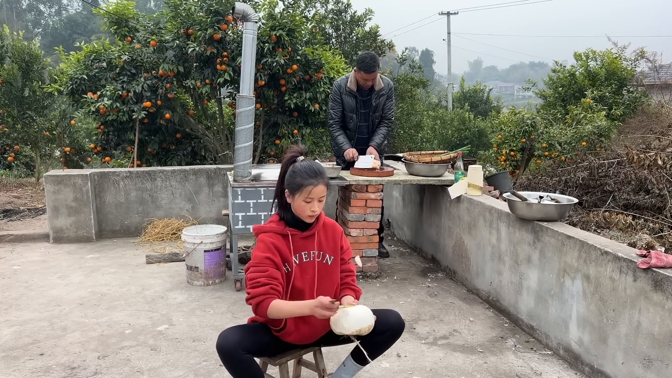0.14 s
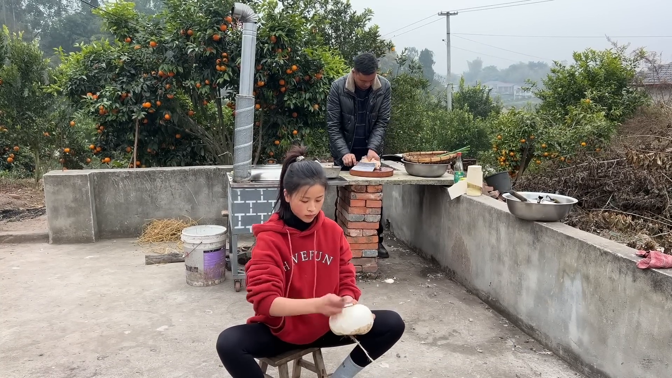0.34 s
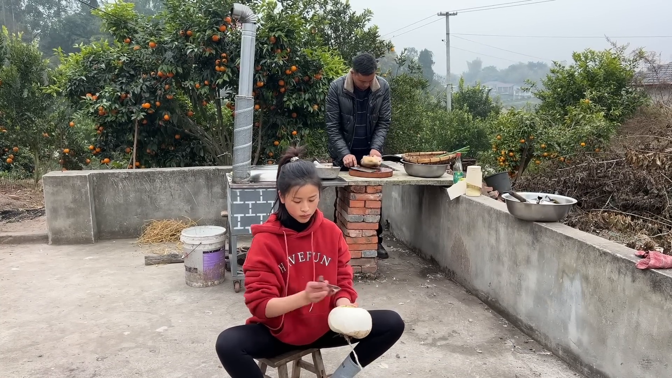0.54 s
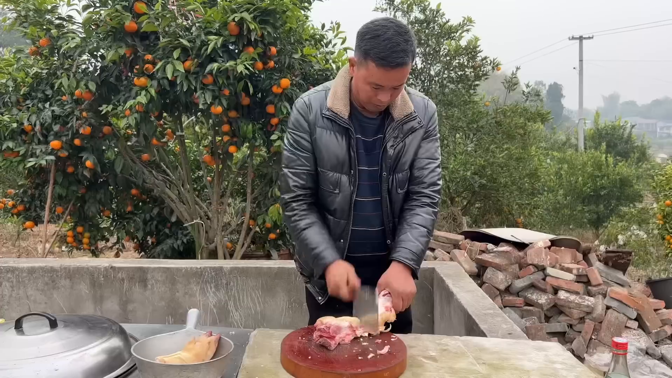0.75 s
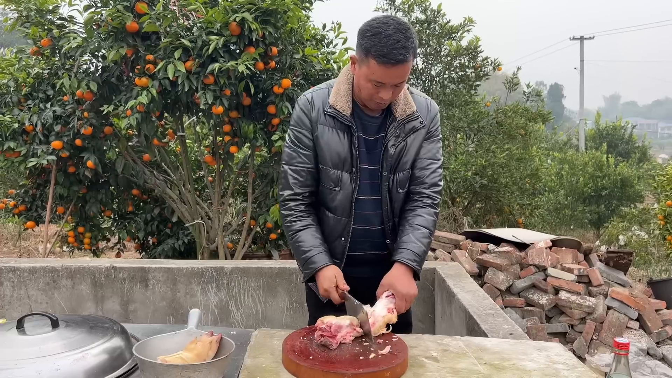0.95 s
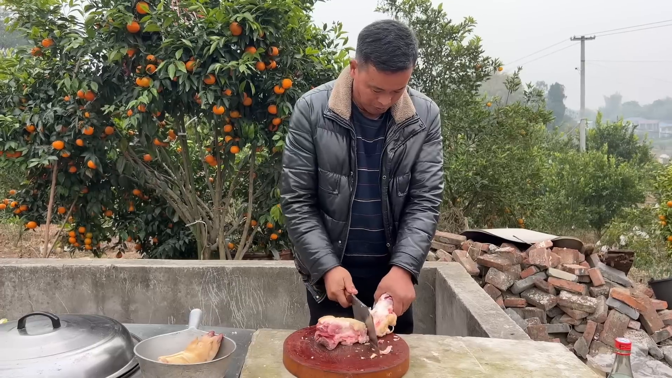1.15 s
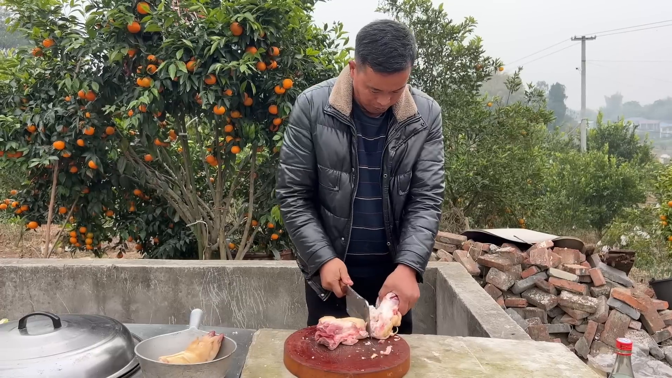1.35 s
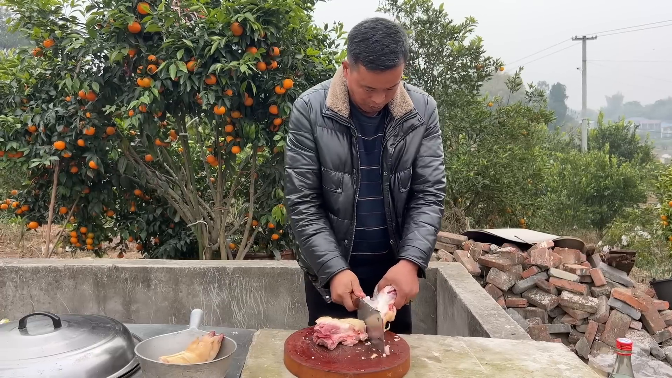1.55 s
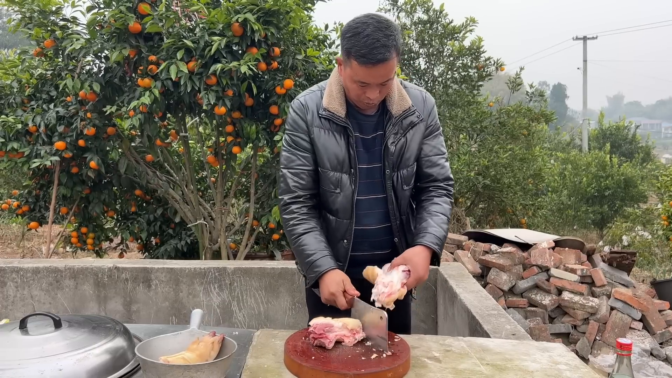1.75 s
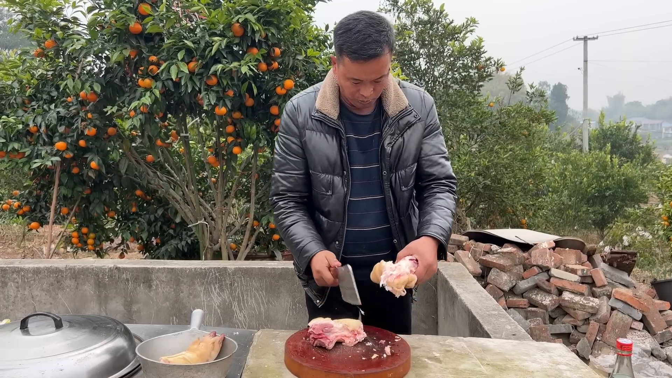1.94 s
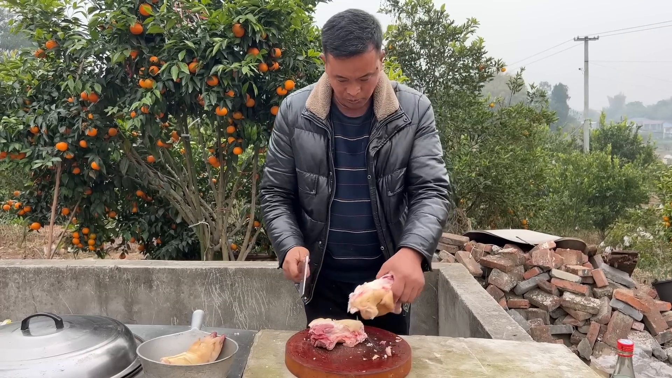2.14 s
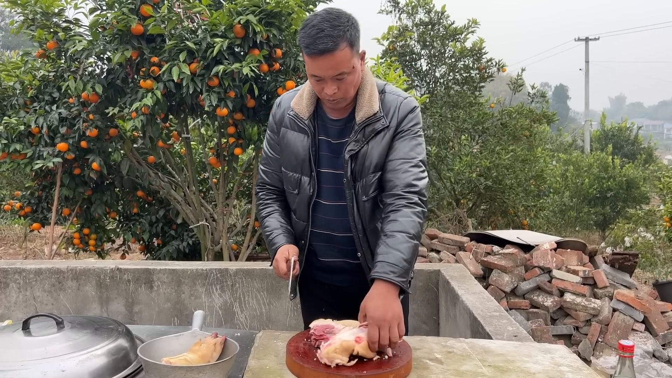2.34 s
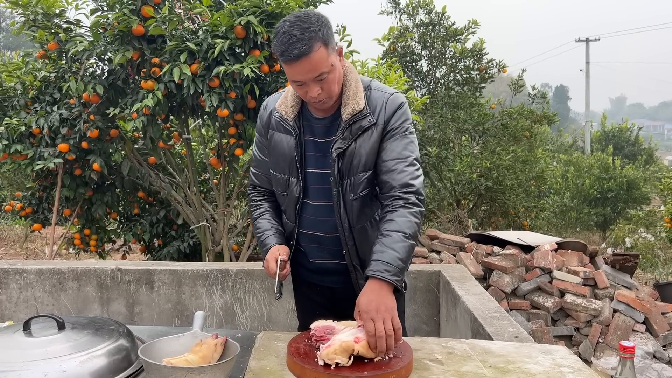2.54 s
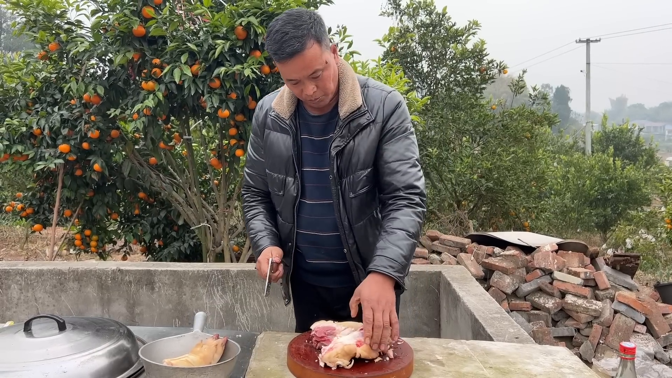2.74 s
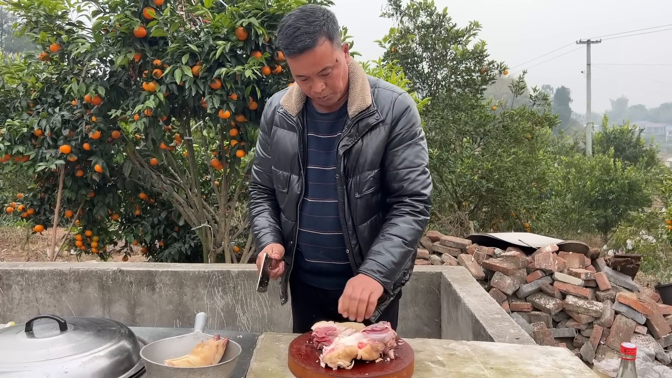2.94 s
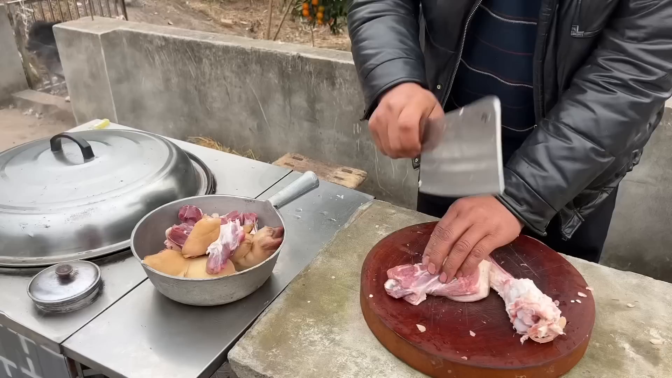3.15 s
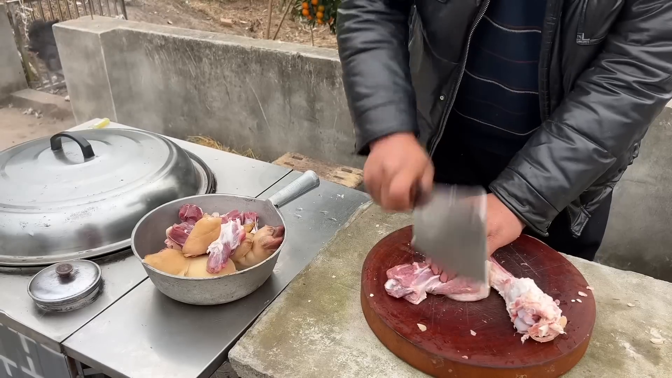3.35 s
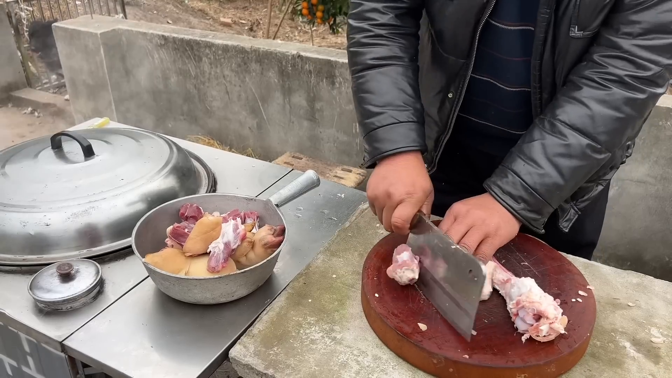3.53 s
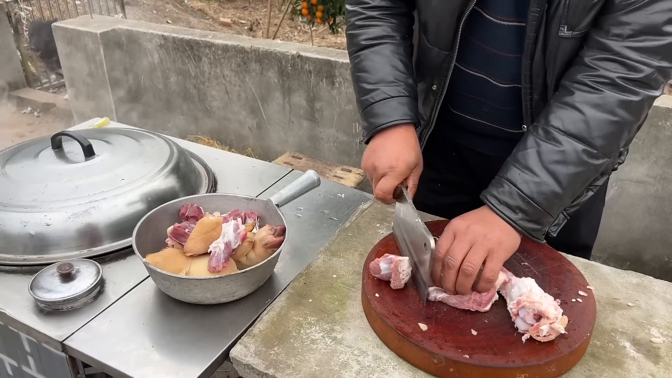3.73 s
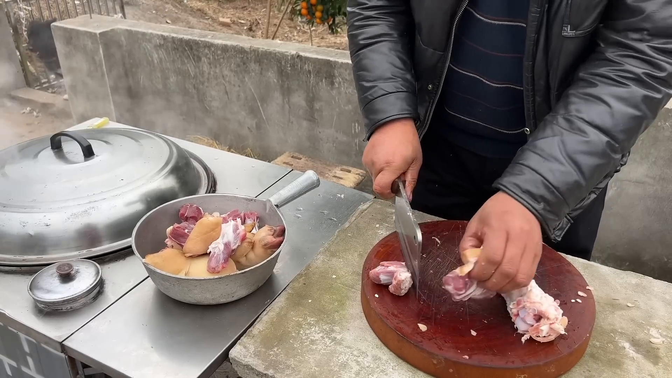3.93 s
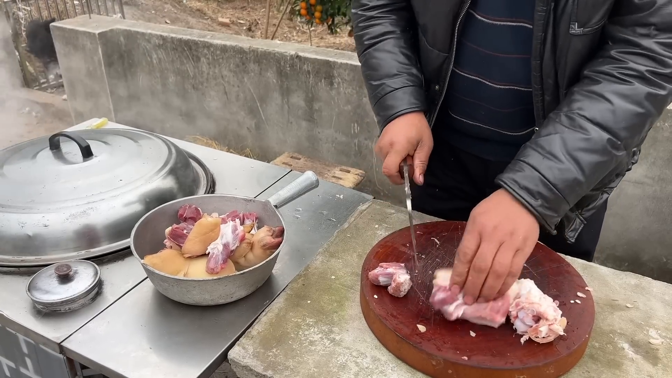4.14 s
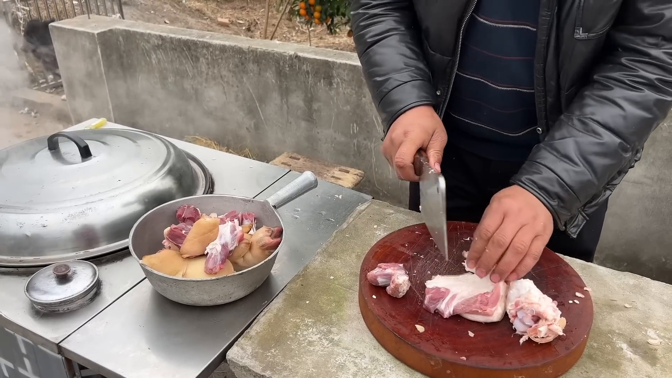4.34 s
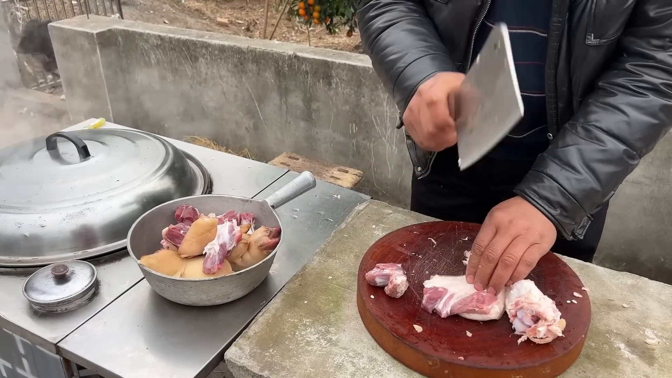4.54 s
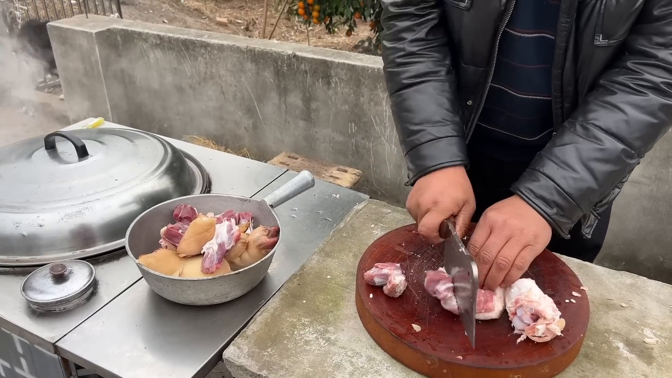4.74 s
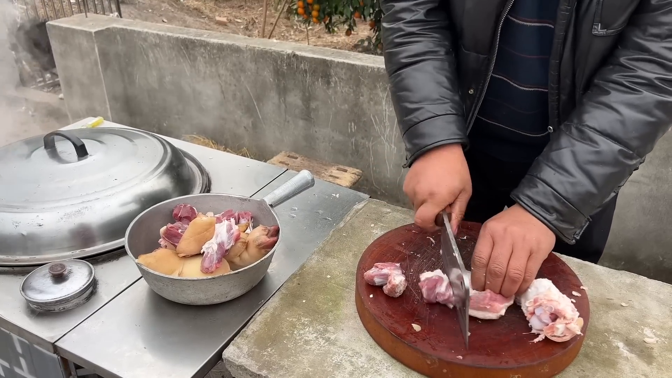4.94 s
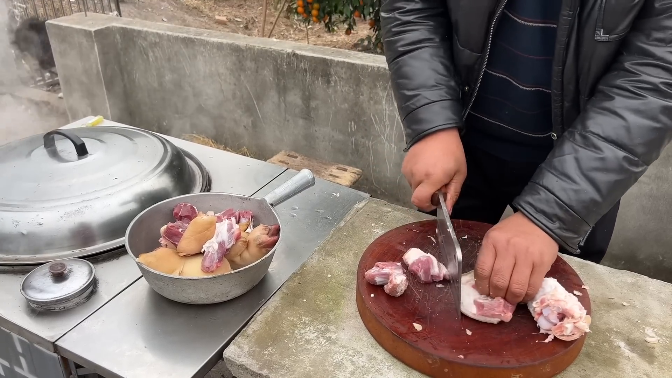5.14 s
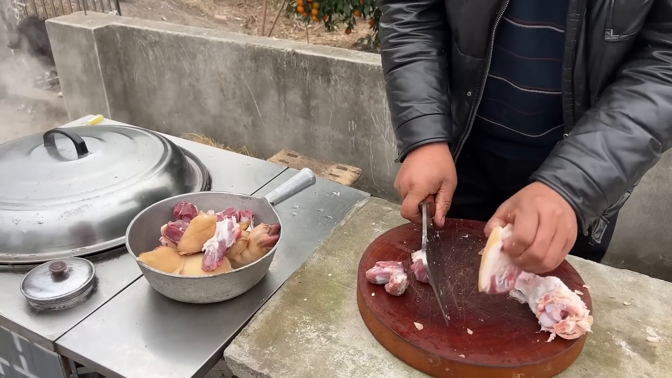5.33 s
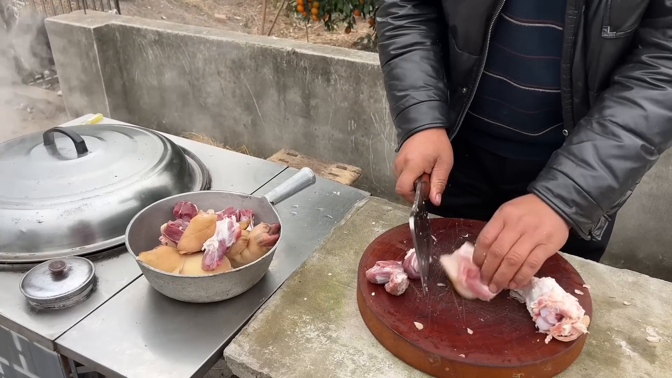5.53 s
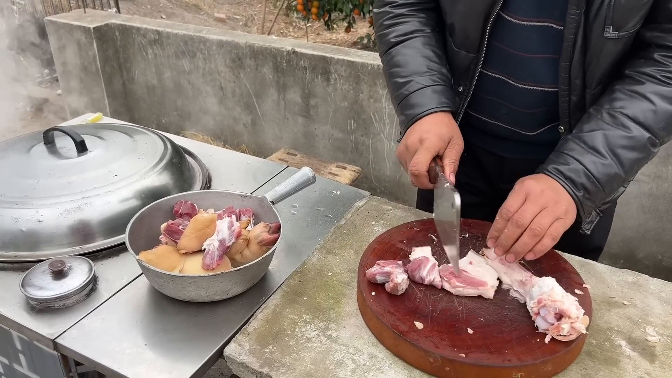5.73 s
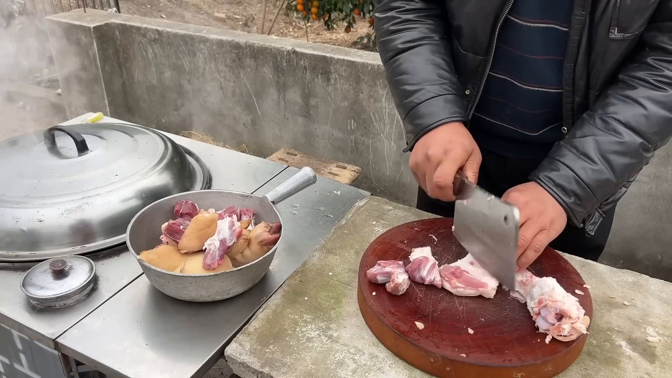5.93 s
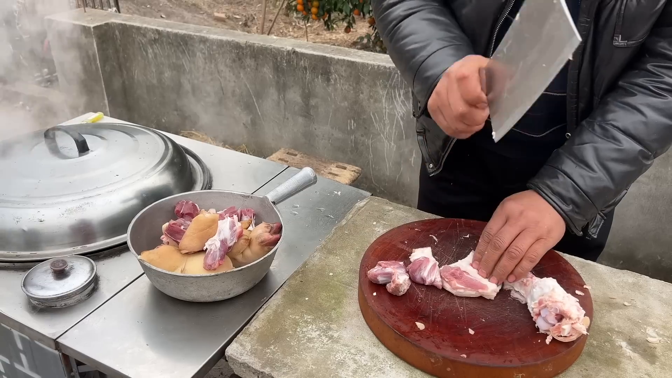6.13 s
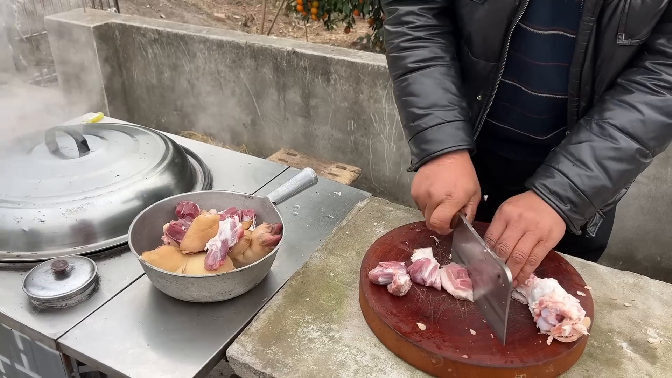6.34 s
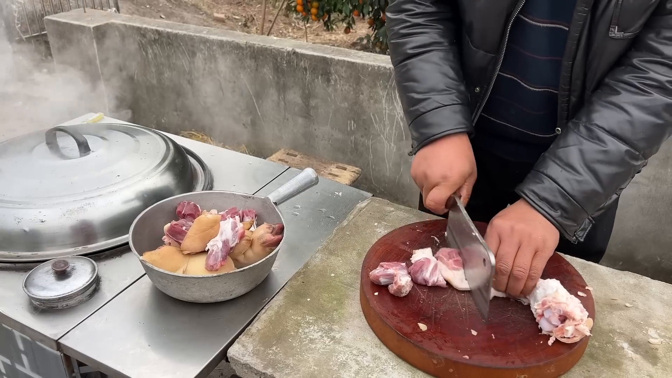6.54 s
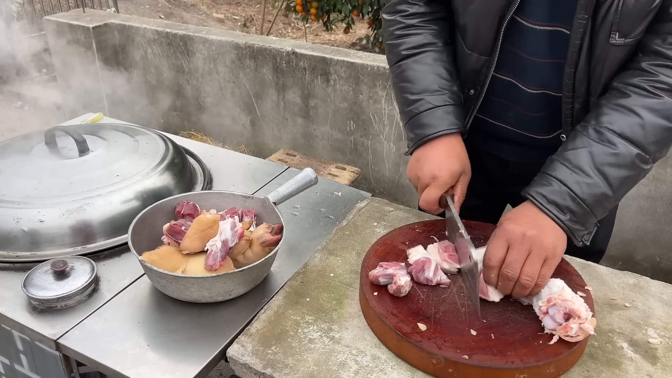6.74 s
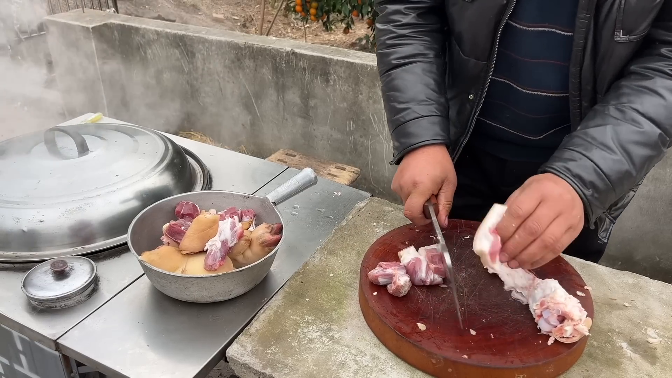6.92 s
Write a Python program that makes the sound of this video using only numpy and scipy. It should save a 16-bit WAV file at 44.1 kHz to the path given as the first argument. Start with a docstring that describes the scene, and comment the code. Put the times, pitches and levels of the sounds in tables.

```python
"""A heavy cleaver chops five times through bone on a wooden block on a stone counter in a walled yard.
Each impact cracks the bone and excites the damped modes of block and blade; the yard reverberates.
A brief, wider scene comes first and is cut short: a low hum, a knife paring a vegetable, a clattering blade.
Between chops, friction makes a jacket rustle and sliding meat rasp; the meat smacks and bumps the block,
the blade clinks and a small bird calls once, all over quiet outdoor air."""
import sys
import numpy as np
from scipy import signal
from scipy.fft import rfft, irfft
from scipy.io import wavfile
from scipy.ndimage import uniform_filter1d

SR = 44100
rng = np.random.default_rng(int(sys.argv[2]) if len(sys.argv) > 2 else 0)


def to_wav(s):
    """Save 16-bit WAV."""
    ch = np.atleast_2d(s).T  # columns
    pcm = np.round(np.clip(ch, -1, 1) * 32767)  # PCM
    wavfile.write(sys.argv[1], SR, pcm.astype(np.int16))


N = 307818
TIME = np.arange(N) / SR
SCENE_CHANGE_S = 0.737

# Levels in the tables are relative; a spectrum lists power density.
# spectrum of outdoor air: frequency_hz, level_db
AIR_SPECTRUM = [(15, -38), (30, -18.5), (50, 4), (75, -0.5), (150, -6), (451, -9), (1160, -21), (1520, -18),
                (2000, -23), (6400, -24), (9000, -30), (10200, -46), (11600, -38), (16000, -52.5)]
# spectrum of the rumble around the hum: frequency_hz, level_db
RUMBLE_SPECTRUM = [(40, -21), (70, 3.5), (110, -2.5), (220, 4), (275, 0), (320, -16.5), (400, -9.5),
                   (520, -53), (1500, -47.5), (5000, -29), (12000, -47.5)]
# strokes of the paring knife: start_s, bite_db, tear_length_s
PARING_STROKES = [(0.004, -40, 0.023), (0.084, -45, 0.0091), (0.178, -32.5, 0.048), (0.397, -31, 0.041),
                  (0.469, -47.5, 0.0098), (0.659, -27, 0.015), (0.72, -39.5, 0.013)]
# spectrum of tearing peel: frequency_hz, level_db
PEEL_SPECTRUM = [(800, -23), (2800, -16.5), (4200, -0.5), (5800, -3), (8000, -4), (10200, -22.5),
                 (11700, -1), (13800, -19), (15200, -6), (16500, -16)]
# light knocks of the blade: start_s, contact_db, ring_db, tilt_db_per_octave, middle_lift_db
BLADE_KNOCKS = [(0.272, -52.5, -61.5, -4.5, 0), (0.3166, -33, -41.5, -6.5, 10.5),
                (0.341, -39, -45.5, -5.5, -18), (0.6131, -22.5, -23.5, 1.5, 4.5),
                (0.6354, -25.5, -37.5, -1.5, 19), (0.6569, -25.5, -42, 4, -3), (0.668, -36.5, -43, -5, 6),
                (1.817, -62, -67, -3, 9.5), (4.1159, -37.5, -39.5, 0.5, -14), (4.216, -52.5, -78, -7.5, -2),
                (4.225, -54, -66, 3.5, -3)]
# spectrum of a hard contact: frequency_hz, level_db
CONTACT_SPECTRUM = [(150, -11.5), (700, -5.5), (2000, -1), (3500, -1.5), (6000, -3.5), (9000, -12.5),
                    (16000, -18)]
# modes of the steel blade: pitch_hz, level_db, t60_s
BLADE_MODES = [(705, -13, .11), (1653, -8, .16), (1958, -3, .11), (2692, -22, .3), (2860, -7, .06),
               (3320, -9, .1), (3530, -11, .08), (3957, -4, .15), (4279, -13, .11), (5035, -11, .36),
               (5510, -3, .15), (6806, -8, .09), (7311, -18, .15), (8000, -5, .04), (9044, -12, .12),
               (11340, -3, .09), (12060, -7, .06), (12630, -11, .07)]
# cleaver blows: start_s, level_db, bass_db, treble_db, decay_ratio, crack_db, counter_delay_s
CLEAVER_BLOWS = [(0.8496, -0.5, -1.5, 0.5, 0.92, -20.5, .0041), (2.4169, -17, -8, -5.5, 1.65, -24, .0041),
                 (3.433, -3, -6.5, 2.5, 0.71, -10.5, .0045), (4.7834, -0.5, -0.5, -1.5, 1.03, -11, .0042),
                 (6.3018, -1.5, 0, -2, 1.02, -16, .0043)]
# resonances of the splitting bone, one list a chop: centre_hz, lift_db
BONE_RESONANCES = [
    [(1300, 13.5), (1620, 9.5), (2750, 9.5), (4750, 13)],
    [(490, 12), (950, 9), (1720, 12.5), (2850, 0)],
    [(715, 12.5), (1310, 2.5), (2450, 0.5), (3200, 5.5)],
    [(350, 6), (970, 10), (1930, 12.5), (3100, 7)],
    [(770, 8.5), (1500, 7), (2100, 8), (3900, 7.5)],
]
# spectrum of steel striking bone and wood: frequency_hz, level_db
BLOW_SPECTRUM = [(35, -33.5), (75, -8.5), (150, -4.5), (260, -4), (400, -1), (550, -2.5), (850, -0.5),
                 (1300, -5), (2300, -5), (3200, -14.5), (4500, -28.5), (8000, -32), (16000, -44)]
# decay of that blow: frequency_hz, t60_s
BLOW_DECAY = [(80, .16), (300, 0.08), (900, .065), (2000, 0.046), (5000, 0.084), (12000, 0.012)]
# onset of that blow: frequency_hz, rise_s
BLOW_ONSET = [(80, .012), (350, 0.0049), (900, 0.00029), (3000, 0.0008)]
# modes of the wooden block: pitch_hz, level_db, t60_s
BLOCK_MODES = [(72, -21, .55), (148, -16, .15), (312, -11, .09), (365, -11, .09), (451, -3, .13),
               (603, -8, .09), (712, -10, .11), (880, -8, .07), (968, -2, .09), (1303, -9, .09),
               (1500, -8, .06), (1725, -13, .07), (1912, -8, .06), (2105, -10, .055), (2353, -12, .05),
               (2862, -16, .055)]
# spectrum of the yard's reverberation: frequency_hz, level_db
YARD_SPECTRUM = [(28, -12), (50, -1.5), (75, 9.5), (130, 0.5), (400, -3.5), (900, -1), (1700, -6),
                 (2800, -12), (4000, -22.5), (7000, -28), (16000, -53.5)]
# reverberation time of the yard: frequency_hz, t60_s
YARD_DECAY = [(80, 0.76), (300, 0.55), (1000, 0.33), (3000, 0.32), (10000, .3)]
# stereo balance of the chops: frequency_hz, left_minus_right_db
CHOP_BALANCE = [(60, 0.5), (300, 1.5), (900, 4), (1500, 2), (2300, -5), (4000, -1), (8000, -3), (14000, 3)]
# arm movements in a padded jacket: start_s, length_s, level_db
ARM_MOVES = [(0.99, 0.13, -56.5), (1.19, 0.096, -55.5), (1.355, 0.075, -55.5), (1.505, 0.098, -52),
             (1.79, 0.023, -64), (2.08, .08, -63), (2.47, 0.12, -57.5), (2.655, 0.11, -60),
             (2.9, 0.24, -66.5), (3.2, .21, -57), (3.615, .16, -61.5), (4.395, 0.55, -59.5),
             (4.94, 0.22, -55), (5.19, 0.27, -53), (5.555, 0.063, -55), (5.8, .19, -69), (6.02, .11, -62),
             (6.15, 0.34, -58), (6.52, .14, -54), (6.74, .12, -59), (6.895, 0.02, -48.5)]
# spectrum of creasing cloth: frequency_hz, level_db
JACKET_SPECTRUM = [(530, -21), (900, -1.5), (3000, -1), (8250, -8), (9770, -22), (10100, -36.5),
                   (11300, -13), (12900, -24.5), (13700, -54.5), (14700, -14.5), (16000, -18)]
# pushes of meat and blade over the wood: start_s, length_s, level_db
SLIDE_MOVES = [(1.185, .045, -48.5), (1.52, 0.061, -44), (2.49, .11, -56), (2.66, 0.14, -64),
               (2.895, 0.065, -57), (4.485, 0.038, -54), (5.24, 0.11, -58), (5.38, 0.082, -53.5),
               (5.51, 0.11, -56.5), (6.57, .13, -59), (6.76, 0.037, -60), (6.895, 0.026, -49.5)]
# spectrum of that sliding: frequency_hz, level_db
SLIDE_SPECTRUM = [(71, -32), (120, -3), (219, -3), (285, -3), (477, -2), (568, -1), (658, -13.5), (950, -2),
                  (1130, -30.5), (1450, -9), (1890, -19), (2580, -11.5), (4000, -45), (5200, -62),
                  (8800, -120)]
# meat, bone and hand bumping the block: start_s, level_db, pitch_hz, t60_s
BLOCK_BUMPS = [(1.215, -50, 418, 0.098), (1.32, -53.5, 295, 0.12), (1.575, -51.5, 485, .09),
               (1.603, -42.5, 306, 0.06), (2.907, -55, 398, 0.097), (3.217, -51.5, 695, 0.12),
               (4.393, -43.5, 350, 0.062), (4.417, -50, 312, 0.18), (5.197, -47, 2200, 0.0084),
               (5.196, -45, 249, 0.071), (6.919, -62, 710, .08)]
# smacks of wet meat: centre_s, level_db, length_s
MEAT_SMACKS = [(2.083, -51.5, 0.017), (2.378, -50, 0.032), (4.089, -57, 0.028), (4.5, -57, 0.024),
               (5.22, -54, 0.0056), (5.615, -56.5, 0.014), (6.542, -55.5, 0.0093), (6.945, -70, 0.012)]
# spectrum of a smack: frequency_hz, level_db
SMACK_SPECTRUM = [(400, 1), (2000, -3.5), (3200, 2.5), (6000, 2.5), (9000, -9), (16000, -45)]
# likeness of left and right channels: frequency_hz, correlation
STEREO_CORRELATION = [(100, 0.97), (400, 0.76), (900, 0.41), (1600, 0.3), (4000, 0.089), (12000, 0.13)]


def amp(db):
    """Amplitude grows tenfold for every 20 dB."""
    return 10 ** (np.asarray(db) / 20)


def unit(x):
    """Normalisation to an rms of 1."""
    return x / np.sqrt(np.mean(x ** 2) + 1e-20)


def read(points, hz):
    """Interpolation of a table on a log-frequency axis."""
    f, value = np.transpose(points)
    return np.interp(np.log(hz + 1), np.log(f + 1), value)


def add(mix, start_s, sound):
    """Superposition: a stereo sound joins the mix at start_s."""
    part = mix[:, max(round(start_s * SR), 0):][:, :sound.shape[1]]
    part += sound[:, :part.shape[1]]


def freqs(size):
    """The Fourier frequencies of a sound of this many samples."""
    return np.fft.rfftfreq(size, 1 / SR)


def wander(samples):
    """A moving average turns white noise into a slow fluctuation of rms 1."""
    return unit(uniform_filter1d(rng.standard_normal(N), samples))


def stereo_field(pair, spectrum):
    """Partial coherence: two signals are coloured and blended, alike in the bass, apart in the treble."""
    hz, (left, other) = freqs(pair.shape[1]), rfft(pair)
    correlation = read(STEREO_CORRELATION, hz)
    right = correlation * left + np.sqrt(1 - correlation ** 2) * other
    return unit(irfft(np.array([left, right]) * amp(read(spectrum, hz)), pair.shape[1]))


def noise(spectrum, size=N):
    """Gaussian stereo noise filtered to a given spectrum."""
    return stereo_field(rng.standard_normal((2, size)), spectrum)


def crackle(spectrum, per_s, spread_db, size=N):
    """Shot noise: tiny snaps of uneven size arrive at random."""
    arrivals = rng.random(size) < per_s / SR
    snaps = arrivals * amp(spread_db * np.minimum(rng.exponential(1, size), 3))
    return stereo_field(snaps * rng.choice([-1, 1], (2, size)), spectrum)


def patchy(x, depth_db, width_hz=260, last_s=0.09):
    """Random spectral modulation: narrow patches of the spectrum come and go."""
    spectra = signal.stft(x, nperseg=512, noverlap=384)[2]
    bins, frames = int(width_hz * 512 / SR), int(last_s * SR / 128)
    field = uniform_filter1d(rng.standard_normal(spectra.shape[1:]), bins, axis=0)
    field = unit(uniform_filter1d(field, frames, axis=1))
    modulated = signal.istft(spectra * amp(depth_db * field), nperseg=512, noverlap=384)[1]
    return unit(modulated[:, :x.shape[1]])


def swell(t, length_s, attack_s, release_s, sag_db=0):
    """An envelope from t = 0: linear attack, sagging hold, exponential release."""
    hold = amp(sag_db * np.clip(t / length_s, 0, 1))
    return np.clip(t / attack_s, 0, 1) * hold * np.exp(-np.maximum(t - length_s, 0) / release_s)


def outdoor_air(level_db=-63):
    """Stationary noise, strongest in the bass, forms the background."""
    return amp(level_db) * noise(AIR_SPECTRUM)


def hum(pitch_hz=70.5, waver=0.021, tone_db=-46, rumble_db=-44.5):
    """Slow frequency modulation makes a low tone waver over a steady rumble."""
    hz = pitch_hz * (1 + waver * wander(4000))
    tone = np.sqrt(2) * np.sin(2 * np.pi * np.cumsum(hz) / SR)
    return amp(tone_db) * tone + amp(rumble_db) * noise(RUMBLE_SPECTRUM)


def paring(bite_s=0.0076, tear_db=-9.5, knife_hz=4960, knife_width_hz=130, knife_gain=4.6):
    """Fracture: peel snaps, then tears on more quietly, driving a resonance of the thin knife."""
    envelope = np.zeros(N)
    for start_s, db, length_s in PARING_STROKES:
        bite = np.exp(-2 * ((TIME - start_s) / bite_s) ** 2)
        tear = swell(TIME - start_s, length_s, attack_s=bite_s, release_s=0.0086)
        envelope += amp(db) * (bite + amp(tear_db) * tear)
    snaps = crackle(PEEL_SPECTRUM, per_s=2400, spread_db=2.5)
    tearing = envelope * patchy(snaps, depth_db=3, width_hz=400, last_s=.025)
    knife = signal.lfilter(*signal.iirpeak(knife_hz, knife_hz / knife_width_hz, SR), tearing)
    return (tearing + knife_gain * knife) * amp([[0], [-2.2]])


def minimum_phase(gain, size):
    """Causality: the filter with this gain curve rings after a hit, never before."""
    cepstrum = irfft(np.log(gain + 1e-9), size)
    cepstrum[:, 1:size // 2] *= 2
    cepstrum[:, size // 2 + 1:] = 0
    return np.exp(rfft(cepstrum))


def shape_burst(x, colour_db, width_hz):
    """Equalisation sets a burst's broad colour and keeps its ripple; its energy is that of 10 ms at rms 1."""
    spectrum, size = rfft(x), x.shape[1]
    broad_power = uniform_filter1d(abs(spectrum) ** 2, int(width_hz * size / SR), axis=1)
    gain = amp(colour_db) / np.sqrt(abs(broad_power) + 1e-12)
    shaped = irfft(spectrum * minimum_phase(gain, size), size)
    return unit(shaped) * np.sqrt(.01 * SR / size)


def surface_reflections(x, latest_s=.003, count=8, strength=.3):
    """Interference with reflections from block, counter and pot lids ripples the spectrum."""
    hz, delays = freqs(x.shape[1]), rng.uniform(.0003, latest_s, count)
    reflections = sum(np.exp(-2j * np.pi * hz * delay_s) for delay_s in delays)
    ripple = 1 + strength * reflections * hz / (hz + 600)
    return irfft(rfft(x) * ripple / np.sqrt(1 + count * strength ** 2), x.shape[1])


def ring(modes, tilt_db=0, middle_db=0, sustain=1, middle_hz=3930, middle_octaves=.2):
    """Free vibration is a sum of damped modes; those near middle_hz depend most on the striking point."""
    t, out = np.arange(SR) / SR, np.zeros((2, SR))
    for (hz, db, t60), (chance_db, phase, side) in zip(modes, rng.standard_normal((len(modes), 3))):
        # high modes reach left and right out of step
        stereo_phase = np.arccos(read(STEREO_CORRELATION, hz)) * np.sign(side) * np.array([[-.5], [.5]])
        octaves = np.log2(hz / middle_hz)
        lift_db = tilt_db * octaves + middle_db * np.exp(-(octaves / middle_octaves) ** 2)
        fade = amp(-60 * t / (t60 * sustain)) * (1 - np.exp(-t * hz))
        out += amp(db + chance_db + lift_db) * fade * np.sin(2 * np.pi * (hz * t + phase) + stereo_phase)
    return out


def clinks(contact_t60_s=0.017, echo_t60_s=0.22, echo_db=-8, far_cutoff_hz=8500, free_sustain=1.36):
    """Light impacts excite the blade's modes; in the wide scene they are duller and reverberate."""
    out, hz, t = np.zeros((2, N)), freqs(SR), np.arange(SR) / SR
    lowpass = signal.butter(6, far_cutoff_hz, fs=SR, output="sos")
    for start_s, contact_db, ring_db, tilt_db, middle_db in BLADE_KNOCKS:
        far = start_s < SCENE_CHANGE_S
        fade = amp(-60 * t / contact_t60_s) + far * amp(echo_db - 60 * t / echo_t60_s)
        colour_db = read(CONTACT_SPECTRUM, hz) + tilt_db * np.log2((hz + 500) / 4000)
        contact = shape_burst(noise(CONTACT_SPECTRUM, SR) * fade, colour_db, width_hz=600)
        sustain = 1 if far else free_sustain  # held clear of the block, the blade rings longer
        clink = amp(contact_db) * surface_reflections(contact)
        clink += amp(ring_db) * ring(BLADE_MODES, tilt_db, middle_db, sustain)
        if far:
            clink = signal.sosfilt(lowpass, clink) * (start_s + t < SCENE_CHANGE_S)
        add(out, start_s, clink)
    return out


def die_away(x, t60_of, rise_of, bands=14):
    """Frequency-dependent damping: each band swells and fades at its own rate."""
    size, out = x.shape[1], np.zeros_like(x)
    t, spectrum, centres = np.arange(size) / SR, rfft(x), np.geomspace(50, 16000, bands)
    for hz, share in zip(centres, np.eye(bands)):
        band = irfft(spectrum * read(np.c_[centres, share], freqs(size)), size)
        out += band * (1 - np.exp(-t / rise_of(hz))) * amp(-60 * t / t60_of(hz))
    return out


def bone_crack(rise_s=0.002, t60_s=0.023):
    """Brittle fracture releases a short broadband burst."""
    t = np.arange(SR) / SR
    return noise(CONTACT_SPECTRUM, SR) * (1 - np.exp(-t / rise_s)) * amp(-60 * t / t60_s)


def blow(resonances, decay_ratio, width_octaves=0.092, drive_db=-3):
    """Impact noise, coloured by the bone's resonances, is strongest while the edge drives through."""
    hz, t = freqs(SR), np.arange(SR) / SR
    bone_db = sum(db * np.exp(-(np.log2((hz + 1) / f) / width_octaves) ** 2) for f, db in resonances)
    burst = die_away(noise(BLOW_SPECTRUM, SR), t60_of=lambda f: decay_ratio * read(BLOW_DECAY, f),
                     rise_of=lambda f: read(BLOW_ONSET, f))
    drive = 1 + amp(drive_db) * swell(t, length_s=.0075, attack_s=0.0024, release_s=0.0033)
    return shape_burst(burst * drive, read(BLOW_SPECTRUM, hz) + bone_db, width_hz=110)


def counter_reflection(x, delay_s, strength=0.21, cutoff_hz=1300):
    """Dipole radiation: the counter returns the blade's inverted back wave, which hollows the tone."""
    hz = freqs(x.shape[1])
    back_wave = strength / (1 + (hz / cutoff_hz) ** 2) * np.exp(-2j * np.pi * hz * delay_s)
    return irfft(rfft(x) * (1 - back_wave), x.shape[1])


def chops(blow_db=-7, block_db=-12.5, steel_db=-46, yard_db=-31, crack_lead_s=0.0043):
    """Impulse excitation: the edge cracks the bone, block and blade ring, and the yard reverberates."""
    out, hz, t = np.zeros((2, N)), freqs(SR), np.arange(SR) / SR
    end_fade = np.minimum(4 * (1 - t), 1)
    for row, resonances in zip(CLEAVER_BLOWS, BONE_RESONANCES):
        start_s, db, bass_db, treble_db, decay_ratio, crack_db, delay_s = row
        chop = amp(blow_db) * counter_reflection(blow(resonances, decay_ratio), delay_s)
        add(chop, .001, amp(block_db) * ring(BLOCK_MODES))
        add(chop, .001, amp(steel_db) * ring(BLADE_MODES, tilt_db=-7))
        yard = die_away(noise(YARD_SPECTRUM, SR), lambda f: read(YARD_DECAY, f), rise_of=lambda f: .01)
        add(chop, .008, amp(yard_db) * yard)
        shelves_db = bass_db / (1 + (hz / 220) ** 2) + treble_db * hz ** 2 / (hz ** 2 + 1800 ** 2)
        add(out, start_s, irfft(rfft(chop) * amp(db + shelves_db), SR) * end_fade)
        add(out, start_s - crack_lead_s, amp(db + crack_db) * bone_crack())
    balance_db = read(CHOP_BALANCE, freqs(N)) * np.array([[.5], [-.5]])
    return irfft(rfft(out) * amp(balance_db), N)


def stick_slip(moves, catch_db, catch_s):
    """Friction's envelope: each move speeds up, sags and stops while the surfaces catch at random."""
    gain = sum(amp(db) * swell(TIME - start_s, length_s, attack_s=0.027, release_s=.033, sag_db=-1)
               for start_s, length_s, db in moves)
    return gain * amp(catch_db * wander(int(catch_s * SR)))


def jacket(level_db=-2.5):
    """Cloth creases in many tiny snaps, which merge into a rustle as an arm moves."""
    cloth = patchy(crackle(JACKET_SPECTRUM, per_s=3500, spread_db=-0.5), depth_db=4.5)
    return amp(level_db) * stick_slip(ARM_MOVES, catch_db=1.13, catch_s=0.03) * cloth


def slides(level_db=-2):
    """Sliding friction of meat and blade on wood makes a low rasp."""
    drag = patchy(crackle(SLIDE_SPECTRUM, per_s=2500, spread_db=0.5), depth_db=2)
    return amp(level_db) * stick_slip(SLIDE_MOVES, catch_db=2.7, catch_s=0.017) * drag


def bumps(width_octaves=0.465, rise_s=0.00066):
    """Soft impacts on the wood excite one broad, quickly damped band each."""
    out, hz, t = np.zeros((2, N)), freqs(SR), np.arange(SR) / SR
    for start_s, db, pitch_hz, t60_s in BLOCK_BUMPS:
        push = noise(BLOW_SPECTRUM, SR) * amp(-60 * t / t60_s) * (1 - np.exp(-t / rise_s))
        band_db = -20 * np.log10(1 + (np.log2((hz + 1) / pitch_hz) / width_octaves) ** 2)
        add(out, start_s, amp(db) * shape_burst(push, band_db, width_hz=170))
    return out


def smacks():
    """Adhesion fails: wet meat lets go in bursts of snaps, each coloured by its own reflections."""
    out, t = np.zeros((2, N)), np.arange(SR) / SR - .5
    for centre_s, db, length_s in MEAT_SMACKS:
        snaps = crackle(SMACK_SPECTRUM, per_s=4600, spread_db=3, size=SR)
        burst = amp(db) * np.exp(-2 * (t / length_s) ** 2) * snaps
        add(out, centre_s - .5, surface_reflections(burst))
    return out


def bird(level_db=-44, start_hz=7650, end_hz=7150, echo_db=-12, echo_t60_s=0.71):
    """One thin call glides down in frequency; diffuse reflection from the walls prolongs it."""
    hz = np.interp(TIME, [2.29, 2.345], [start_hz, end_hz]) + 60 * wander(100)
    envelope = amp(level_db) * np.exp(-((TIME - 2.319) / 0.018) ** 2)
    call = envelope * np.sin(2 * np.pi * np.cumsum(hz) / SR)
    walls = rng.standard_normal((2, SR // 2)) * amp(-60 * np.arange(SR // 2) / SR / echo_t60_s)
    echo = signal.fftconvolve(call[None], walls / np.linalg.norm(walls[0]), axes=1)[:, :N]
    return call + amp(echo_db) * echo


def scene():
    """The sources add by superposition; hum and paring stop when the wide scene ends."""
    cleaver = chops() + clinks()
    handling = (jacket() + slides() + smacks() + bumps()) * amp([[1.1], [-1.1]])
    wide_scene = (hum() + paring()) * (TIME < SCENE_CHANGE_S)
    return cleaver + handling + wide_scene + bird() + outdoor_air()


def record(dry, ceiling=.91, dip_s=0.01, second_dip_s=3.192, cutoff_hz=16200):
    """Soft saturation rounds the chops; the level dips at the scene change and once more; a low-pass follows."""
    rounded = dry / (1 + (dry / ceiling) ** 6) ** (1 / 6)
    dips = np.prod([1 - np.exp(-((TIME - s) / dip_s) ** 4) for s in (SCENE_CHANGE_S, second_dip_s)], axis=0)
    lowpass = signal.firwin(511, cutoff_hz, window=("kaiser", 9), fs=SR)
    return signal.oaconvolve(rounded * dips, lowpass[None], "same")


dry = scene()
out = record(dry)
to_wav(out)
```